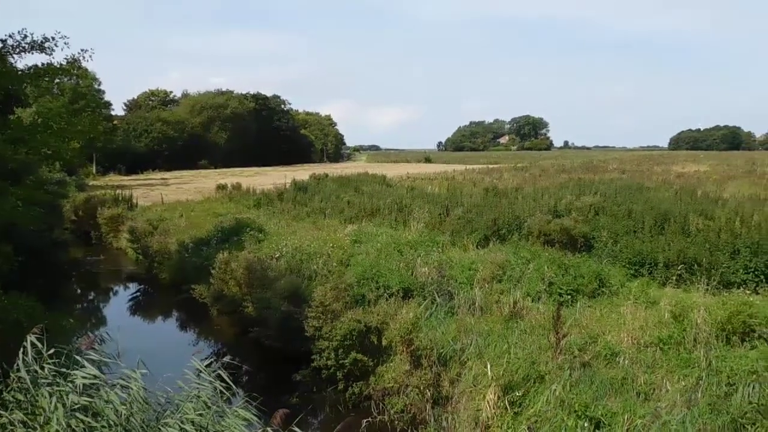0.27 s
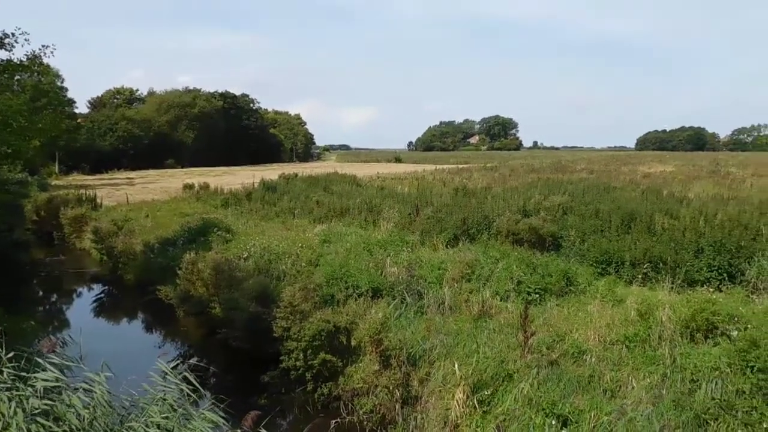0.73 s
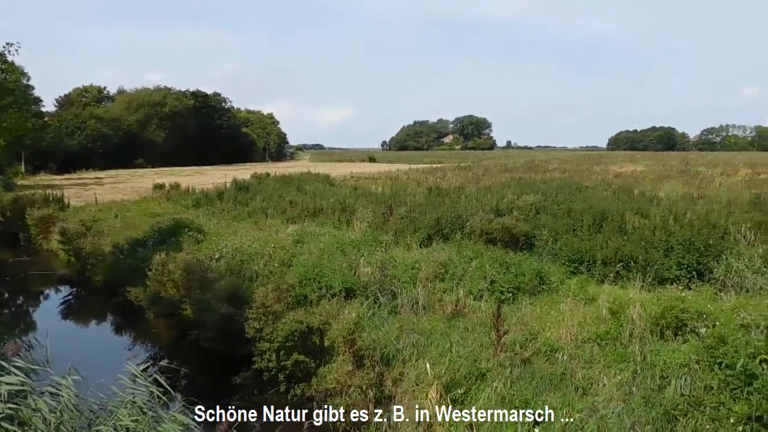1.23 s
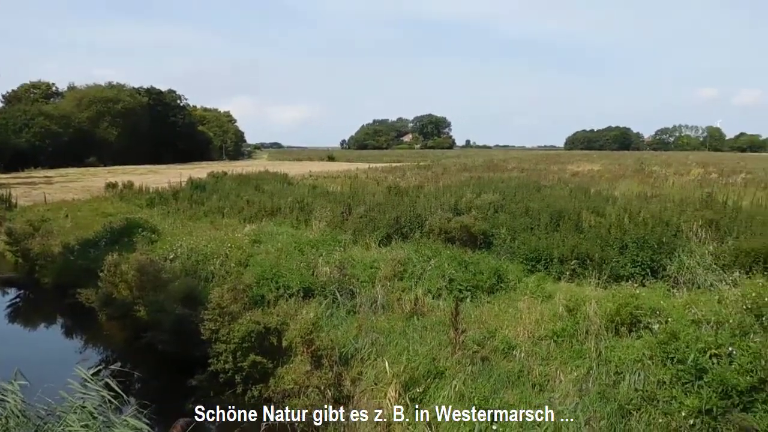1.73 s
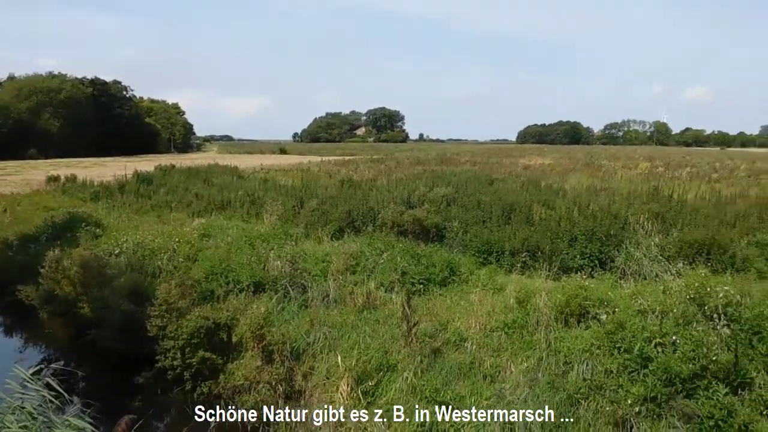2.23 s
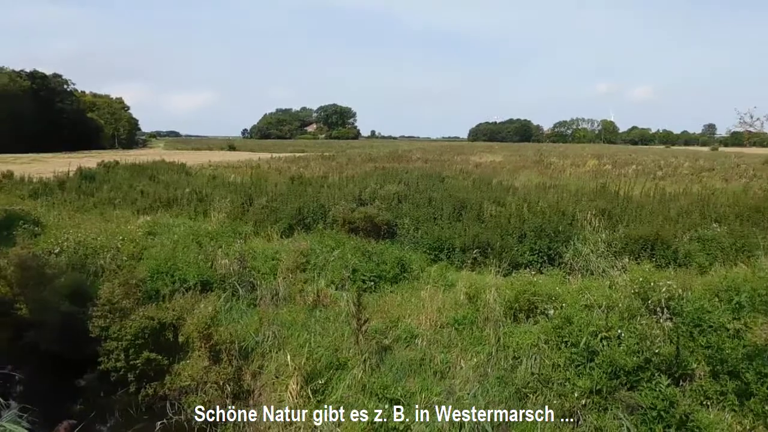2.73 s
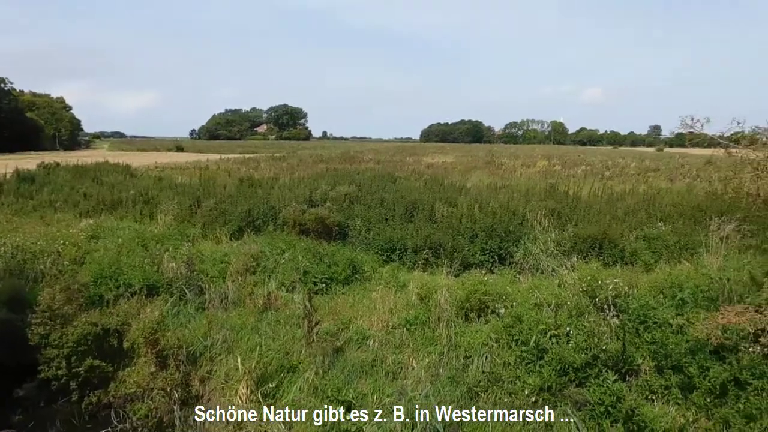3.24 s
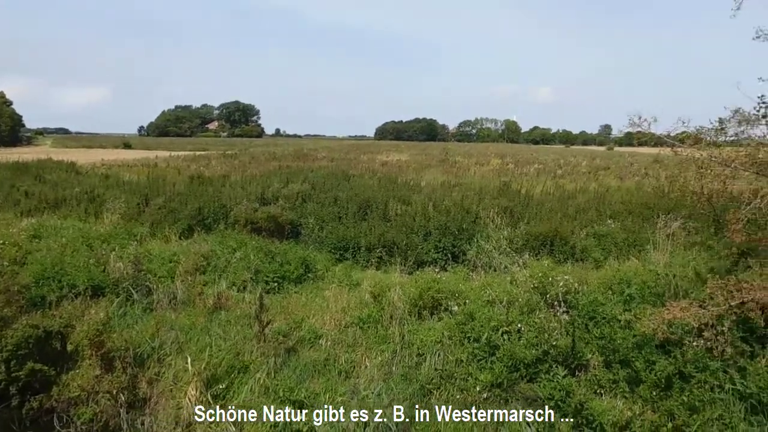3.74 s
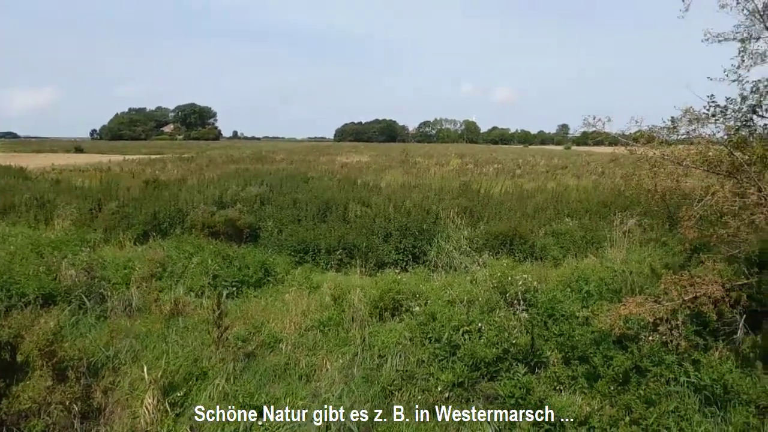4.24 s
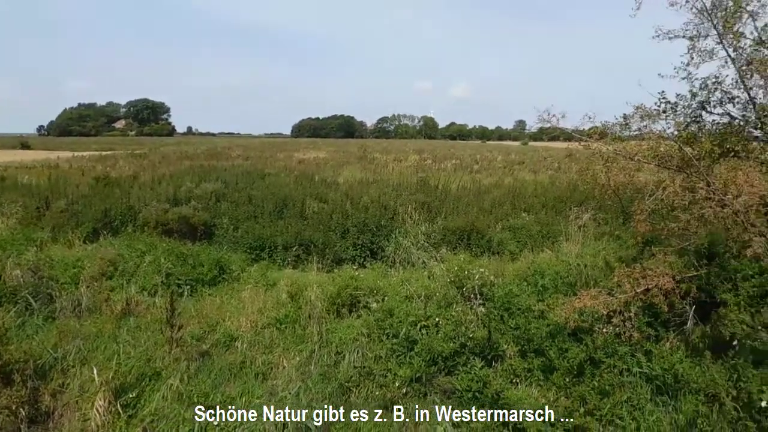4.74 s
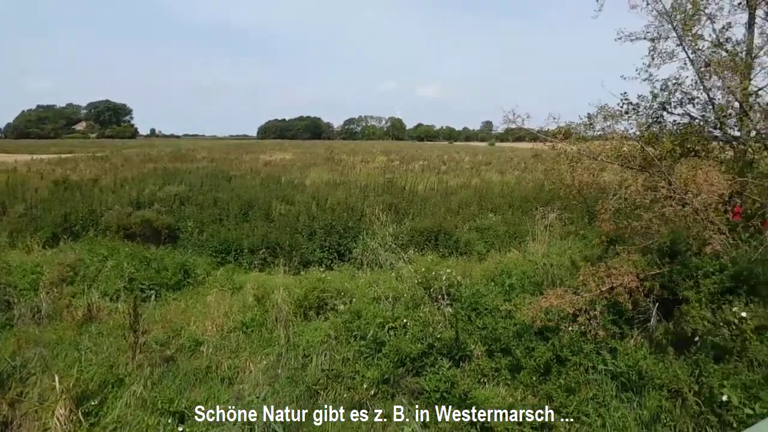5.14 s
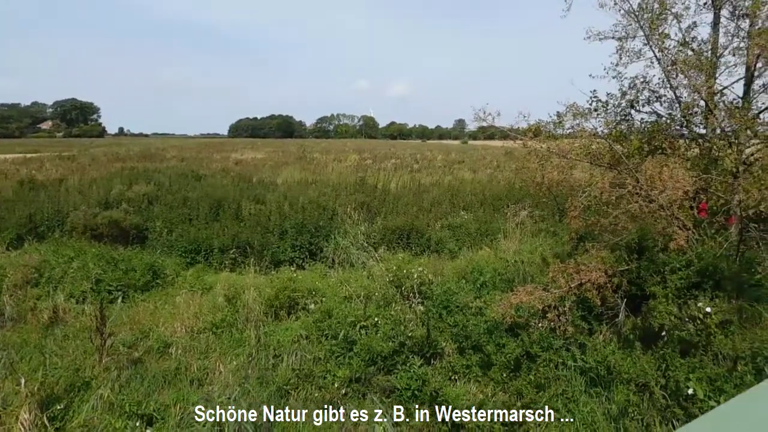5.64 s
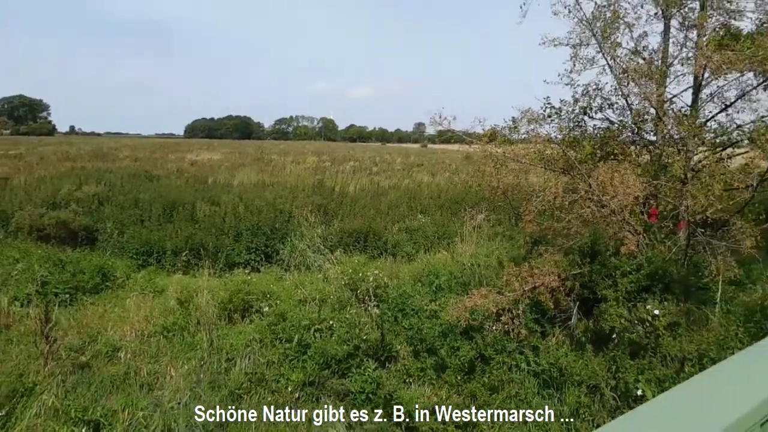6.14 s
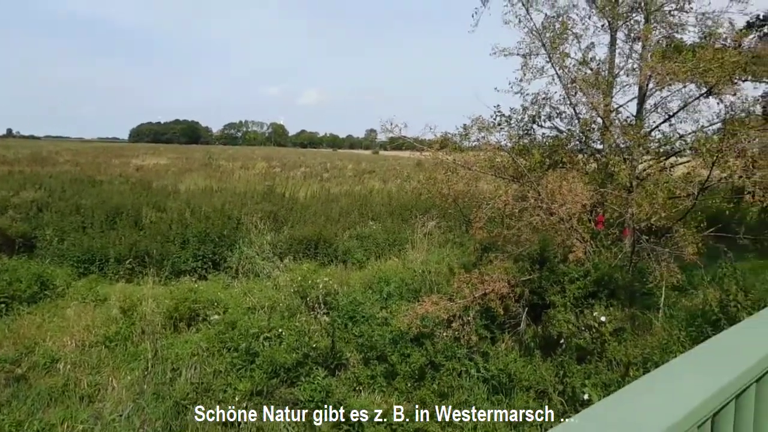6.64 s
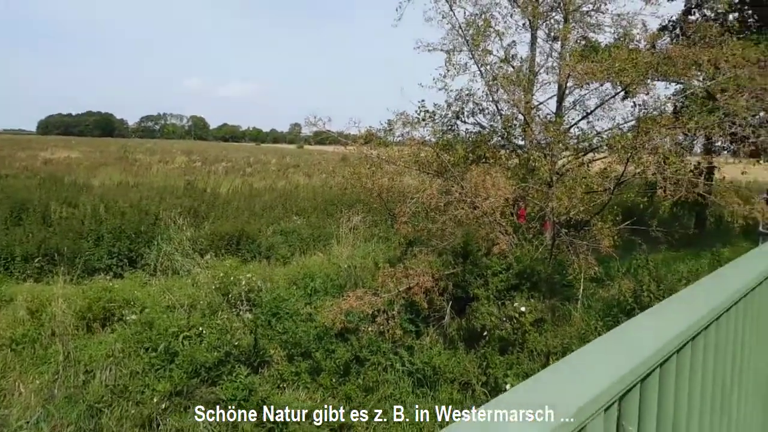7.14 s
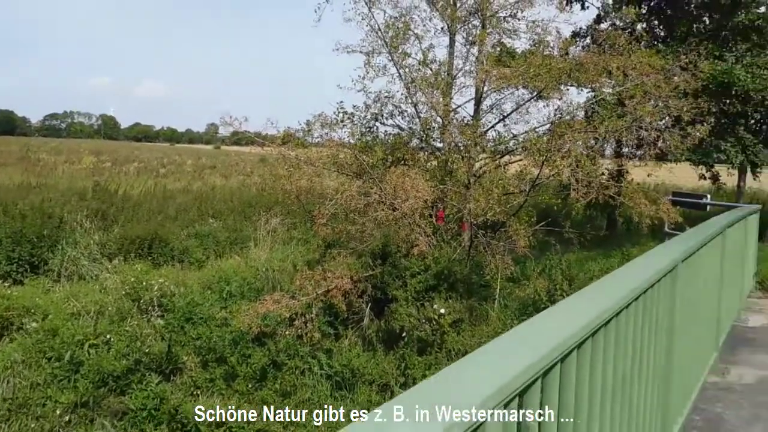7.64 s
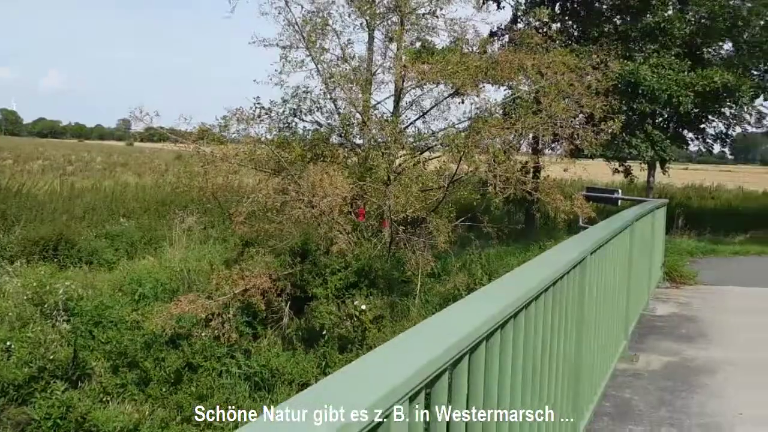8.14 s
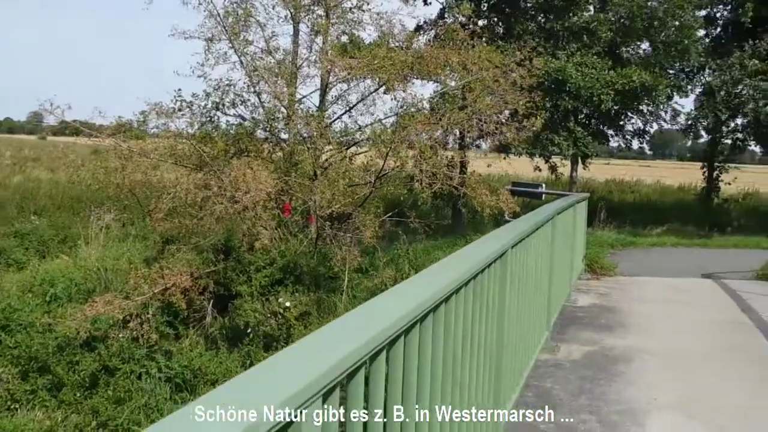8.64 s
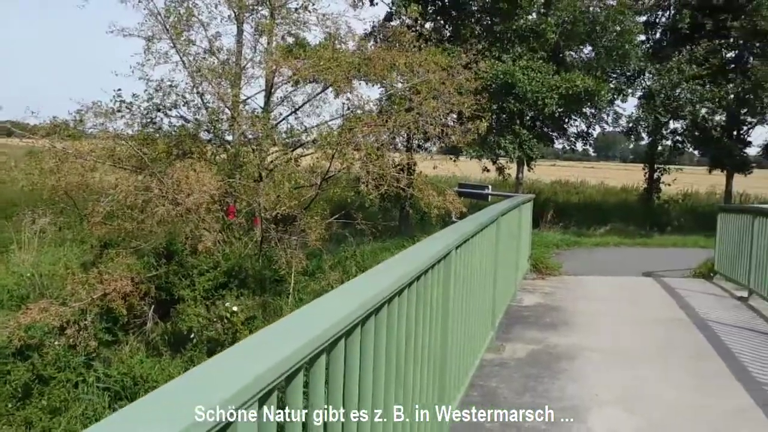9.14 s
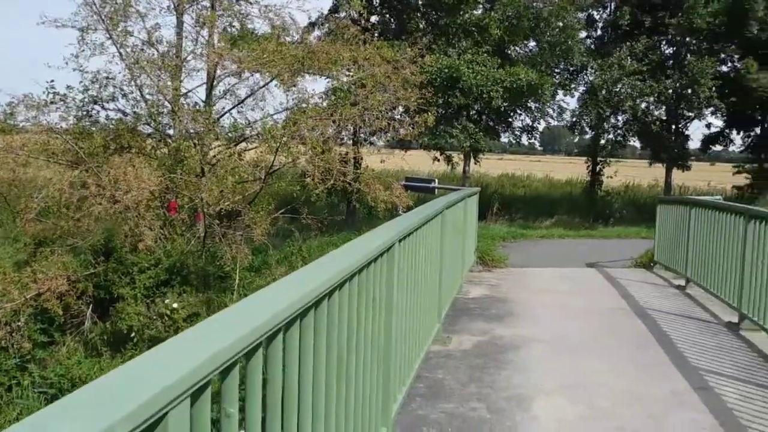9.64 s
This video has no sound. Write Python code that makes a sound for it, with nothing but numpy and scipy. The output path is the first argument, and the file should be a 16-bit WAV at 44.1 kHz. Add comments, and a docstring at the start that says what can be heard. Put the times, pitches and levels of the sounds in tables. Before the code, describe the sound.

An open meadow by a footbridge, heard in stereo from a handheld camera with soft hiss and faint low wind puffs. From the start an unseen car approaches, its hollow mid-range tyre roar and low engine hum peaking near 4 s, then dropping away by about 6 s. A second car emerges gradually and swells through 9 s, still loud and near at the end around 10 s. A small nearby bird gives quick falling two-note buzzing whistles at roughly 0.6, 1.5, 2.5, 3.5, 5.2, 6.1, 7.2, 8.1 and 9.4 s, with slight echoes, moving leftward. Fainter birds chip around it, densest early. Grass and leaves rustle with fine ticks, swelling near 3.4, 6.6 and most at 9.2 s. A prominent handling knock lands at 3.3 s, a small click at 3.9, and duller light bumps at 5.8, 6.7, 7.4 and 7.8 s.

```python
"""Open meadow by a footbridge: on a road out of sight one car passes and a second draws near, as shaped noise and engine tones.
Close by in a bush a small bird repeats a falling two-note call of buzzing whistles; other birds chip around it.
A breeze rustles grass and trees, made of a noise wash and separate ticks.
The hand-held camera turns slowly; there are a few knocks on it and small high ticks such as a twig or leaf.
Its microphones add puffs of wind and hiss."""
import sys
import numpy as np
from scipy import signal
from scipy.fft import rfft, irfft
from scipy.io import wavfile
from scipy.ndimage import uniform_filter1d

SR = 44100
rng = np.random.default_rng(int(sys.argv[2]) if len(sys.argv) > 2 else 0)


def wrap_up_sound(samples):
    """Save the sound to the file named by the first command line argument, as 16-bit audio."""
    columns = np.atleast_2d(samples).T
    # keep every value between -1 and 1, then stretch to whole-number steps
    tamed = np.clip(columns, -1, 1)
    steps = np.round(tamed * 32767).astype(np.int16)
    wavfile.write(sys.argv[1], SR, steps)


N = 435708
FRAME, HOP = 2048, 512  # short-time frames, samples
FRAME_S = np.arange(N // HOP + 3) * HOP / SR
BIN_HZ = np.fft.rfftfreq(FRAME, 1 / SR)
TIME = np.arange(N) / SR

# pass of each car [nearest t/s, approach time scale/s, retreat time scale/s,
# tyre roar lost per tenfold distance/dB]
FIRST_PASS = (4.03, 1.986, 0.91, 36.3)
SECOND_PASS = (10.08, 1.366, 1.28, 17.34)
# openings (+) and thickets (-) between road and bridge [t/s, half width/s, tyre roar level/dB]
OPENINGS = [(.6, 0.17, 1.6), (2.1, 0.25, 1.3), (3.65, 0.52, 1), (6.26, 0.36, -2.5), (9.0, 0.59, 7),
            (9.6, 0.26, -2.5)]
# spectral shape of each car's tyre roar, before the tread resonance [f/Hz, relative level/dB]
FIRST_ROAR = [(200, -50), (500, -17), (750, -2), (1000, -1), (1300, -0.5), (1750, -2.5), (2100, -10),
              (2600, -12), (3500, -13.5), (5000, -28.5), (8000, -46), (16000, -36)]
SECOND_ROAR = [(200, -28.5), (500, -31), (750, -3.5), (1000, -0.5), (1300, 1), (1750, 2.5), (2100, -1.5),
               (2600, -10), (3500, -13), (5000, -20.5), (8000, -33.5), (16000, -63)]
# spectral shape of each car's body rumble [f/Hz, relative level/dB]
FIRST_RUMBLE = [(20, -21), (60, -18), (90, -16), (120, -13), (170, -11), (260, -3.5), (400, -1), (560, 2.5),
                (680, 3), (900, -21), (2000, -50)]
SECOND_RUMBLE = [(20, -27), (70, -16.5), (110, -17), (170, -14), (240, -11), (350, -3), (470, -4.5),
                 (560, 6), (660, 5.5), (900, -4), (2000, -50)]
# centre of each car's tread resonance [t/s, f/Hz]
FIRST_TREAD = [(0, 1060), (1.2, 936), (2.9, 863), (3.6, 1060), (5.2, 985)]
SECOND_TREAD = [(6.5, 910), (7.3, 1130), (8.5, 1170), (9.1, 1330), (9.88, 1270)]
# direction of each car [t/s, lead of the left microphone/ms]
FIRST_LEAD = [(1.9, 0.01), (3.5, 0.13), (6.5, 0.11)]
SECOND_LEAD = [(8.5, -0.12), (9.5, -0.059)]
# lean of each car to the left, as the camera body shades it [f/Hz, left minus right level/dB]
FIRST_LEAN = [(600, 1), (1200, 1.2), (1700, 3.5), (2500, 6), (3500, 4), (5300, 24), (8000, -5)]
SECOND_LEAN = [(400, 1.2), (650, 0), (1050, 0.4), (1700, 1), (2600, 4.5), (3500, 0), (5300, 16.5),
               (8000, -3)]
# likeness of the road at the two microphones [f/Hz, likeness 0-1]
ROAD_SAME = [(30, 1), (130, 1), (300, 0.92), (600, 0.89), (1000, 0.97), (1600, 0.74), (3000, 0.65),
             (6000, 0.74), (12000, 0)]
# engine orders of each car [multiple of the firing note, relative level/dB]
FIRST_ORDERS = [(1, -3), (2, -2), (3, -2)]
SECOND_ORDERS = [(.5, -10), (1, -1)]
# each driver's change of throttle [t/s, change of level/dB]
FIRST_THROTTLE = (3.9, -3)
SECOND_THROTTLE = (9.15, 10.7)

# calls of the near bird [t/s, high note level/dB, delay of low note/s, low note level/dB, pitch factor]
BIRD_CALLS = [(.587, -38.5, 0.048, -44.5, .98), (1.518, -39.5, .046, -42.5, .99),
              (2.521, -37, 0.053, -40.5, 1.0), (3.526, -40.5, 0.043, -41, 1.03),
              (5.169, -47.5, 0.034, -48, 1.04), (6.1, -43.5, .042, -50, 0.98),
              (7.187, -43, 0.046, -45, 1.02), (8.122, -42.5, 0.036, -43.5, 1.02),
              (9.35, -41, .055, -49, 1.025)]
# notes of a call, before the pitch factor [length/s, starting f/Hz, final f/Hz]
GRACE_NOTE = (0.02, 5600, 5200)
HIGH_NOTE = (0.0424, 4820, 4300)
LOW_NOTE = (.046, 4010, 3500)
NOTE_ATTACK_S, NOTE_RELEASE_S = 0.0081, 0.0094
GRACE_EARLY_S, GRACE_DB = 0.012, -14.5  # time before, and level relative to, the high note
# the camera turns away from the bird, which moves to the left
FACING_BIRD_S, TURN_DEG_PER_S = 1.8, 7.6
PORT_DELAY_MS = .14  # between the microphones, with the bird fully to the side
BIRD_LEAN_DB, SHADE_DB = 5.5, 6.5  # left minus right with the bird ahead, and extra fully to the side

# knocks on the camera, and small high ticks such as a twig or leaf
# [t/s, level/dB, starting f/Hz, final f/Hz, rise and decay time/s]
KNOCKS_AND_TICKS = [(3.335, -18.5, 1170, 910, 0.00087), (3.38, -51, 8300, 7600, .0005),
                    (3.939, -32.5, 4800, 3280, 0.00028), (5.789, -32, 1360, 198, 0.0022),
                    (5.852, -38, 1100, 299, 0.00056), (6.735, -38.5, 700, 281, 0.00096),
                    (7.387, -38, 705, 190, 0.0013), (7.783, -42, 600, 220, 0.0012)]

# chips from the bushes around at set times [t/s, middle f/Hz, level/dB]
CHIPS = [(.235, 3950, -57), (.69, 4500, -53), (1.26, 4700, -55), (1.28, 3540, -50), (3.252, 4800, -49),
         (4.29, 4960, -54), (4.37, 3850, -54), (4.81, 4350, -54), (5.1, 4200, -54), (5.815, 3250, -53.5),
         (6.43, 4200, -56)]
# further chips at random, about as faint as the weakest of these:
# centre, octaves either way, level, time scale over which they thin out
TWITTER_HZ, TWITTER_SPREAD_OCT, TWITTER_DB, TWITTER_FADE_S = 3890, .28, -55, 2.0

# spectral shape of the foliage [f/Hz, relative level/dB]
LEAVES = [(500, -27), (1700, 3.5), (2500, 3), (3500, -2), (4600, -3), (5800, -5), (7000, -12), (9000, -21),
          (16000, -27)]
# swells of broadband hiss: gusts in the foliage, and at 4.45 s the passing car's brighter tyre hiss
# [t/s, half width/s, level/dB, tilt from 1 to 6 kHz/dB per octave]
HISS_SWELLS = [(3.4, .8, -51.5, 0.5), (4.45, 0.55, -54, -10), (6.62, 0.5, -55.5, 3.5),
               (9.2, 0.98, -48, 1.7)]
CALM_DB = -55  # wash between the swells

# puffs of wind on the microphones [t/s, half width/s, level/dB]
PUFFS = [(.85, .1, -72), (1.55, .1, -70), (3.83, 0.19, -62), (4.45, .3, -67)]
# spectral shape of that wind [f/Hz, relative level/dB]
BUFFET_COLOUR = [(10, -3), (30, 7), (60, 8), (100, -15), (200, -8), (600, -45), (2000, -80)]
# spectral shape of the microphone hiss [f/Hz, relative level/dB]
HISS = [(100, 0.5), (6000, 2), (10000, 1), (12500, 0), (14500, 4.5), (16000, 3)]
# balance of the hiss [f/Hz, left minus right level/dB]
HISS_LEAN = [(5000, 2), (10000, -1.5), (15000, -5.8)]
EDGE_HZ = 15850  # upper band limit of the camera


def gain_of(db):
    """Decibels to gain."""
    return 10 ** (np.asarray(db) / 20)


def evened(x):
    """Scales to an rms of one."""
    return x / np.sqrt(np.mean(x ** 2) + 1e-20)


def colour(points, hz=BIN_HZ):
    """Reads a spectrum on a logarithmic frequency axis."""
    f, value = np.transpose(points)
    return np.interp(np.log(hz + 1), np.log(f + 1), value)


def follow(curve, t):
    """Reads a curve over time at the times t."""
    s, value = np.transpose(curve)
    return np.interp(t, s, value)


def swell(s, width, t):
    """A smooth rise and fall of height one around time s."""
    return np.exp(-((t - s) / width) ** 2)


def add(mix, s, sound):
    """Mixes a stereo sound in at time s."""
    part = mix[:, max(round(s * SR), 0):][:, :sound.shape[1]]
    part += sound[:, :part.shape[1]]


def wander(shape, size):
    """Smooth chance of rms one, with features about size steps long."""
    x = rng.standard_normal(shape)
    for axis, steps in enumerate(size):
        x = uniform_filter1d(uniform_filter1d(x, steps, axis), steps, axis)
    return evened(x)


def at_level(shape_db, level_db):
    """Short-time magnitudes with the given spectral shape and rms level."""
    shape = gain_of(shape_db)
    return gain_of(level_db) * shape / np.sqrt(np.mean(shape ** 2, axis=-1, keepdims=True))


def sides(lean_db):
    """Gains of the left and right microphones for a level difference."""
    return gain_of([[lean_db / 2], [-lean_db / 2]])


def noise(magnitude, same, lean_db, lead_ms=0):
    """Stereo noise from short-time magnitudes, with a likeness, a lean and a delay between the sides."""
    a, b, c, d = rng.standard_normal((4, len(FRAME_S), len(BIN_HZ)))
    same = np.clip(same, -1, 1)
    left = a + 1j * b
    right = same * left + np.sqrt(1 - same ** 2) * (c + 1j * d)
    right = right * np.exp(-2j * np.pi * BIN_HZ * lead_ms / 1000)
    pair = np.array([left * gain_of(lean_db / 2), right * gain_of(-lean_db / 2)])
    # the root is the level constant of the overlapping frames
    z = magnitude * pair * np.sqrt(3 / FRAME)
    _, sound = signal.istft(z, nperseg=FRAME, noverlap=FRAME - HOP, time_axis=1, freq_axis=2)
    return sound[:, :N]


def whistle(hz, db, lead_ms, lean_db):
    """A pure gliding tone as it reaches the two microphones."""
    turns = np.cumsum(hz) / SR
    late = turns - hz * lead_ms / 1000
    return gain_of(db) * np.sin(2 * np.pi * np.array([turns, late])) * sides(lean_db)


def scatter(x, t60):
    """Sparse, quickly fading echoes from trunks and foliage."""
    t = np.arange(SR // 2) / SR
    echoes = rng.random((2, len(t))) < 2500 / SR  # 2500 echoes per second
    taps = rng.standard_normal((2, len(t))) * echoes * gain_of(-60 * t / t60)
    taps = taps / np.linalg.norm(taps, axis=1, keepdims=True)
    return signal.fftconvolve(x, taps, axes=1)[:, :N]


def road(emerges_s=5.7, emerge_length_s=0.99):
    """One car draws away as the next comes out from behind the trees on the right."""
    first = car(FIRST_PASS, FIRST_TREAD, FIRST_ROAR, FIRST_RUMBLE, FIRST_LEAD, FIRST_LEAN,
                roar_db=-35.0, rumble_db=-47.0, rumble_growth=0.82, rumble_ahead_s=0.092,
                tread_db=9, octave_db=3.5, width_hz=310, brighten=0.11, patchy_db=1.1)
    first += engine(FIRST_PASS, FIRST_ORDERS, FIRST_THROTTLE, firing_hz=85.6, level_db=-70.5,
                    growth=2.1, ahead_s=0.74, throb_db=4.0, exhaust_db=7.5)
    second = car(SECOND_PASS, SECOND_TREAD, SECOND_ROAR, SECOND_RUMBLE, SECOND_LEAD, SECOND_LEAN,
                 roar_db=-36.5, rumble_db=-38.0, rumble_growth=1.85, rumble_ahead_s=-0.3,
                 tread_db=6.5, octave_db=1, width_hz=410, brighten=0.14, patchy_db=1.1)
    second += engine(SECOND_PASS, SECOND_ORDERS, SECOND_THROTTLE, firing_hz=134.5, level_db=-69.5,
                     growth=0.49, ahead_s=0.14, throb_db=2.0, exhaust_db=0.0)
    emerged = .5 + .5 * np.tanh((TIME - emerges_s) / emerge_length_s)
    return first + second * np.sqrt(emerged)


def nearness_db(passing, t):
    """Level of a passing car relative to its nearest point, falling with the log of distance."""
    nearest_s, approach_s, retreat_s, fall_db = passing
    time_scale = np.where(t < nearest_s, approach_s, retreat_s)
    distance = np.hypot(1, (t - nearest_s) / time_scale)
    return -fall_db * np.log10(distance)


def car(passing, tread_curve, roar, rumble, lead, lean, roar_db, rumble_db, rumble_growth,
        rumble_ahead_s, tread_db, octave_db, width_hz, brighten, patchy_db):
    """Tyre roar with a drifting tread resonance and its octave, brighter when louder, over a low rumble."""
    t = FRAME_S[:, None]
    heard_db = nearness_db(passing, t) + sum(db * swell(s, width, t) for s, width, db in OPENINGS)
    tread_hz = follow(tread_curve, t)
    tread = 0
    for k, peak_db in enumerate((tread_db, octave_db), 1):
        tread = tread + peak_db / (1 + ((BIN_HZ / k - tread_hz) / (width_hz / 2)) ** 2)
    octaves_up = np.clip(np.log2((BIN_HZ + 1) / 1700), 0, 1)
    treble = brighten * (heard_db - heard_db.max()) * octaves_up
    tyres = at_level(colour(roar) + tread + treble, roar_db + heard_db)
    body_db = rumble_db + rumble_growth * nearness_db(passing, t + rumble_ahead_s)
    body = at_level(colour(rumble), body_db)
    # a random patchiness over time and frequency roughens the noise
    patches = gain_of(patchy_db * wander(tyres.shape, size=(4, 14)))
    return noise(np.hypot(tyres, body) * patches, colour(ROAD_SAME), colour(lean), follow(lead, t))


def engine(passing, orders, throttle, firing_hz, level_db, growth, ahead_s, throb_db, exhaust_db,
           doppler=.027, waver=0.0066, throttle_s=0.06, exhaust_hz=222, exhaust_width_hz=55):
    """A wavering firing note with its orders and a breathy exhaust; its pitch sinks as the car passes."""
    change_s, change_db = throttle
    load_db = change_db * (.5 + .5 * np.tanh((TIME - change_s) / throttle_s))
    nearest_s = passing[0]
    hz = firing_hz * (1 - doppler * np.tanh(TIME + ahead_s - nearest_s))
    phase = 2 * np.pi * np.cumsum(hz * (1 + waver * wander(N, size=(3000,)))) / SR
    tones = np.zeros(N)
    for k, order_db in orders:
        tones += np.sin(k * phase) * gain_of(order_db + throb_db * wander(N, size=(4000,)))
    pipe_db = -20 * np.log10(1 + ((BIN_HZ - exhaust_hz) / exhaust_width_hz) ** 2)
    exhaust = noise(at_level(pipe_db, exhaust_db), same=0.99, lean_db=-2.0)
    # nearness peaks ahead_s before the nearest point
    heard_db = level_db + load_db + growth * nearness_db(passing, TIME + ahead_s)
    return (np.sqrt(2) * tones + exhaust) * gain_of(heard_db)


def near_bird(bush_db=-8, echo_db=-8.5):
    """Each call is a faint grace note, a high note and then a lower one, with echoes."""
    out = np.zeros((2, N))
    for s, high_db, later, low_db, pitch in BIRD_CALLS:
        side = np.sin(np.radians(TURN_DEG_PER_S * (s - FACING_BIRD_S)))
        add(out, s - GRACE_EARLY_S, note(GRACE_NOTE, high_db + GRACE_DB, pitch, side))
        add(out, s, note(HIGH_NOTE, high_db, pitch, side))
        add(out, s + later, note(LOW_NOTE, low_db, pitch, side))
    # the bush gives a short blur, the trees a longer tail
    return out + gain_of(bush_db) * scatter(out, t60=0.079) + gain_of(echo_db) * scatter(out, t60=0.35)


def note(shape, db, pitch, side, buzz_depth=0.031, buzz_hz=240, buzz_db=2.5, jitter=0.022):
    """One falling whistle, shaken in pitch and loudness by an uneven buzz."""
    length, start_hz, end_hz = shape
    t = np.arange(0, length, 1 / SR)
    envelope = np.minimum(np.minimum(t / NOTE_ATTACK_S, (length - t) / NOTE_RELEASE_S), 1)
    uneven_hz = buzz_hz * (1 + 0.327 * wander(len(t), size=(150,)))
    buzz = np.sin(2 * np.pi * np.cumsum(uneven_hz) / SR)
    hz = pitch * (start_hz + (end_hz - start_hz) * t / length)
    glide = hz * (1 + buzz_depth * buzz + jitter * wander(len(t), size=(100,)))
    lean_db = BIRD_LEAN_DB + SHADE_DB * side
    return envelope * whistle(glide, db + buzz_db * buzz, PORT_DELAY_MS * side, lean_db)


def knocks_and_ticks():
    """A few short damped cycles, falling in pitch as they die."""
    out, t = np.zeros((2, N)), np.arange(SR // 10) / SR
    for s, db, start_hz, end_hz, decay in KNOCKS_AND_TICKS:
        age = t / decay
        hz = end_hz + (start_hz - end_hz) * np.exp(-age / 1.29)
        add(out, s, whistle(hz, db, lead_ms=0, lean_db=1) * age * np.exp(1 - age))
    return out


def far_birds(chip_s=0.029, fall=.131, count=30):
    """Short falling chips from the bushes: some at set times among a random twitter that thins out."""
    twitter = []
    for when, high in rng.random((count, 2)):
        chip_hz = TWITTER_HZ * 2 ** (TWITTER_SPREAD_OCT * (2 * high - 1))
        twitter.append((-TWITTER_FADE_S * np.log(1 - when), chip_hz, TWITTER_DB))
    out, u = np.zeros((2, N)), np.linspace(0, 1, int(chip_s * SR))
    for s, chip_hz, db in CHIPS + twitter:
        glide = chip_hz * (1 - fall * (u - .5) + 0.052 * wander(len(u), size=(50,)))
        add(out, s, whistle(glide, db, lead_ms=0.036, lean_db=3.0) * np.sin(np.pi * u))
    return out + scatter(out, t60=0.13)


def leaves(patchy_db=1.32, ticks_db=-10.0, ticks_per_s=500, spread_db=0.5, lean_db=4):
    """A wash of far foliage and the separate ticks of near blades, both following the swells."""
    octaves = np.log2(np.clip(BIN_HZ, 1000, 6000) / 3000)
    power = at_level(colour(LEAVES), CALM_DB) ** 2
    for s, width, db, tilt_db in HISS_SWELLS:
        tilted = at_level(colour(LEAVES) + tilt_db * octaves, db)
        power = power + tilted ** 2 * swell(s, width, FRAME_S[:, None])
    patches = gain_of(patchy_db * wander(power.shape, size=(5, 30)))
    wash = noise(np.sqrt(power) * patches, -0.082, lean_db)
    strength = np.interp(TIME, FRAME_S, np.sqrt(power.mean(1)))
    sizes = gain_of(spread_db * np.minimum(rng.exponential(1, (2, N)), 5))
    signs = rng.choice([-1, 1], (2, N))
    ticks = sizes * signs * (rng.random((2, N)) < ticks_per_s / SR)
    blade_colour = gain_of(colour(LEAVES, np.fft.rfftfreq(N, 1 / SR)))
    ticks = evened(irfft(rfft(ticks) * blade_colour, N))
    return wash + ticks * strength * gain_of(ticks_db) * sides(lean_db)


def microphones(draught_db=-77, hiss_db=-59.5):
    """Low wind pressure on the ports, a light draught with a few puffs, and steady electronic hiss."""
    puffs = sum(gain_of(db) * swell(s, width, FRAME_S) for s, width, db in PUFFS)
    pressure = gain_of(draught_db) + puffs
    wind = at_level(colour(BUFFET_COLOUR), 0) * pressure[:, None]
    hiss = at_level(colour(HISS), hiss_db)
    # each port feels partly its own eddies
    buffet = noise(wind, same=.55, lean_db=1.7)
    return buffet + noise(hiss, same=0, lean_db=colour(HISS_LEAN))


def scene():
    """Everything heard from the bridge."""
    return road() + leaves() + near_bird() + far_birds() + knocks_and_ticks() + microphones()


def record(dry):
    """The camera's band limit, a steep low-pass."""
    low_pass = signal.firwin(801, EDGE_HZ, window=("kaiser", 9), fs=SR)
    return signal.oaconvolve(dry, low_pass[None], "same")


dry = scene()
out = record(dry)
wrap_up_sound(out)
```